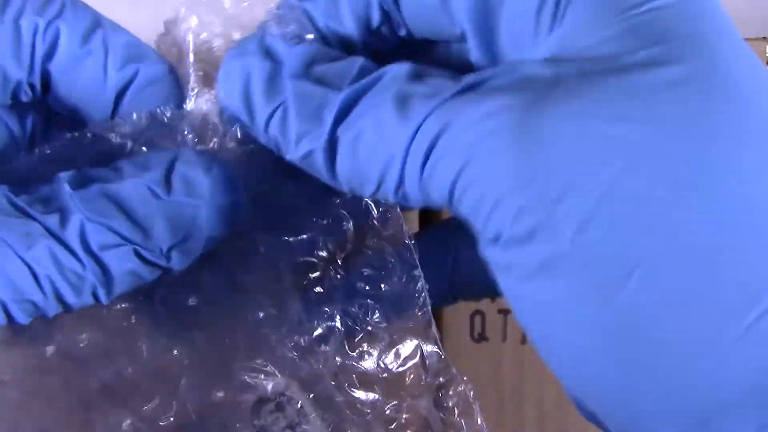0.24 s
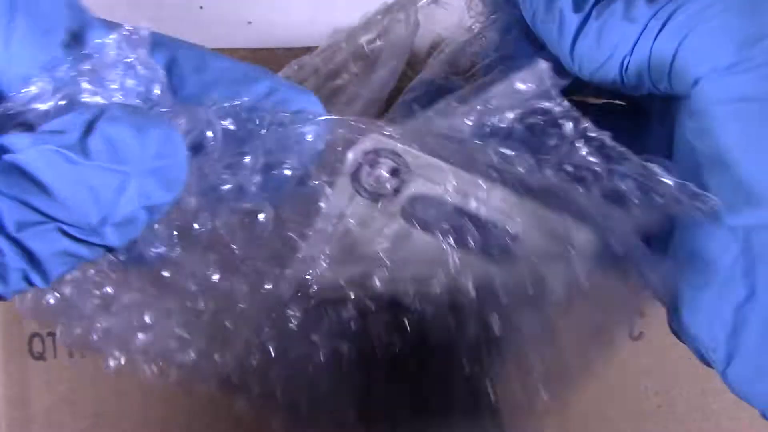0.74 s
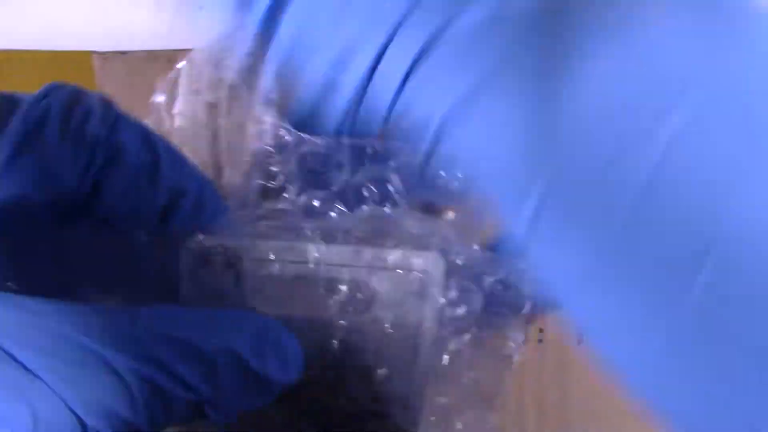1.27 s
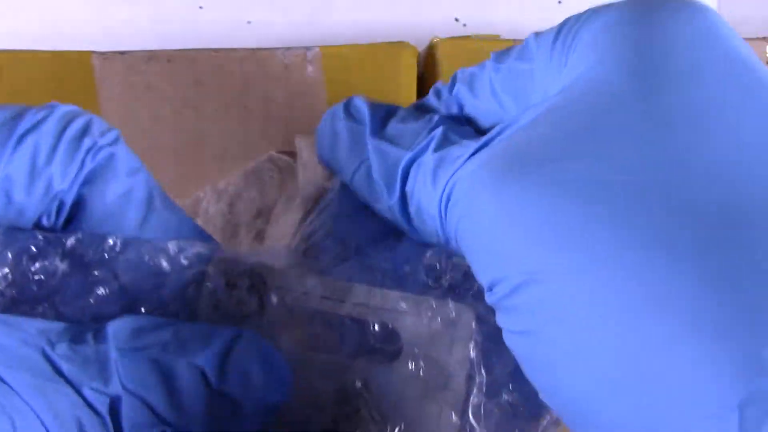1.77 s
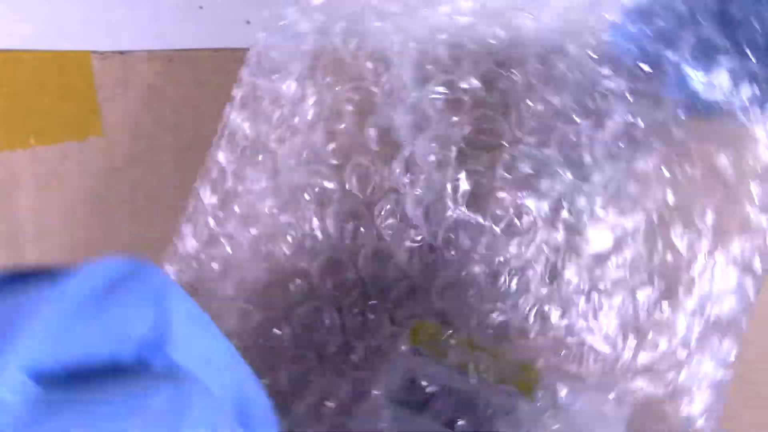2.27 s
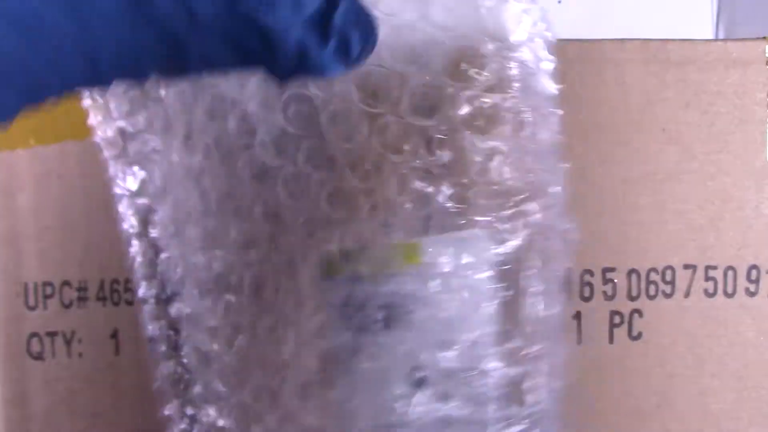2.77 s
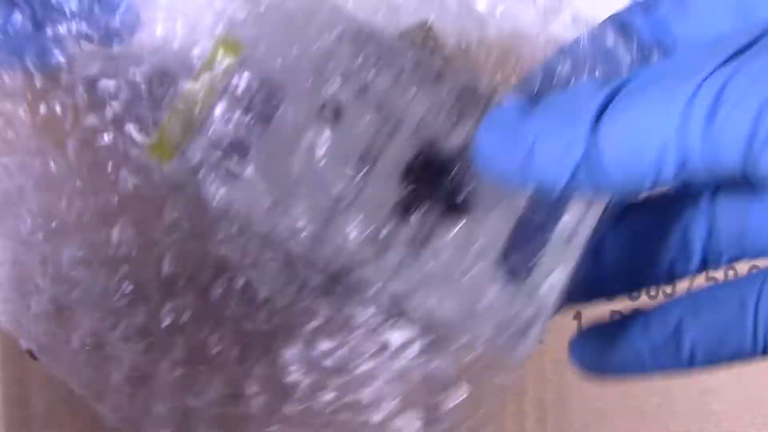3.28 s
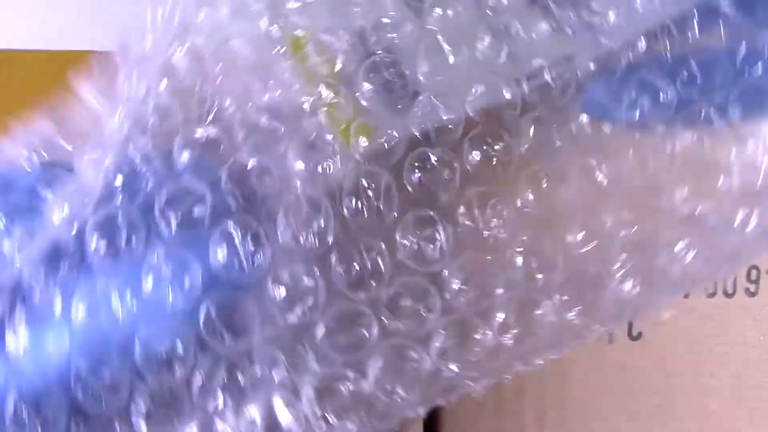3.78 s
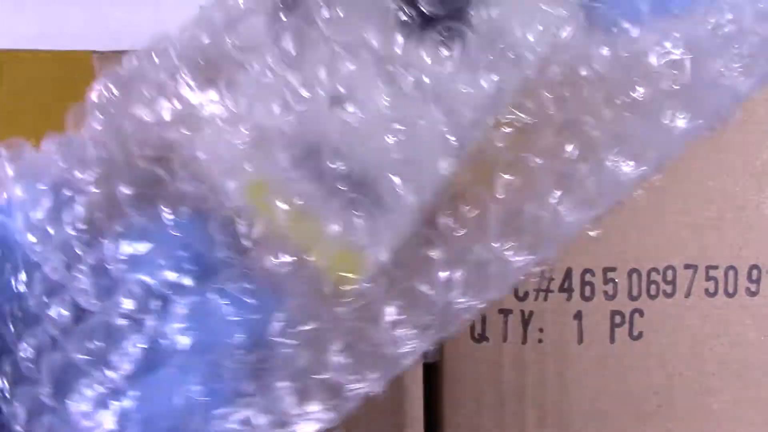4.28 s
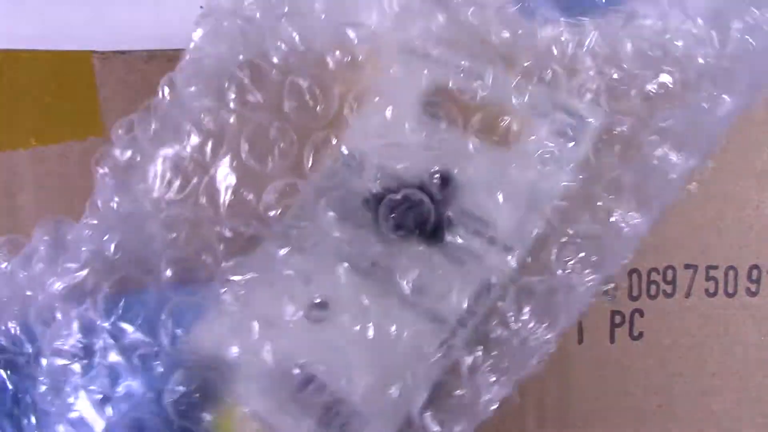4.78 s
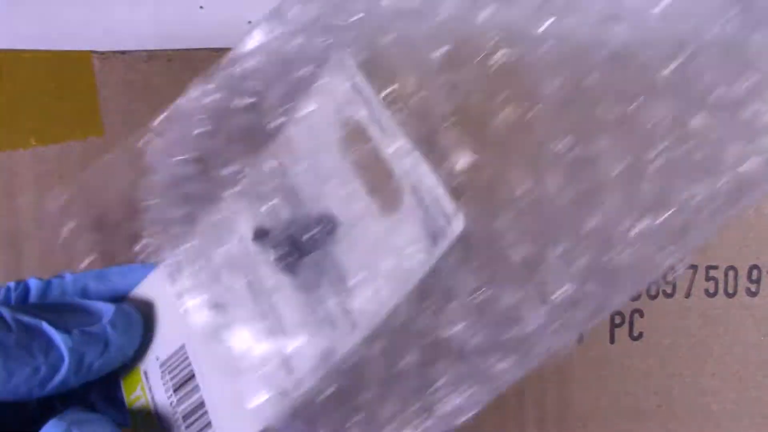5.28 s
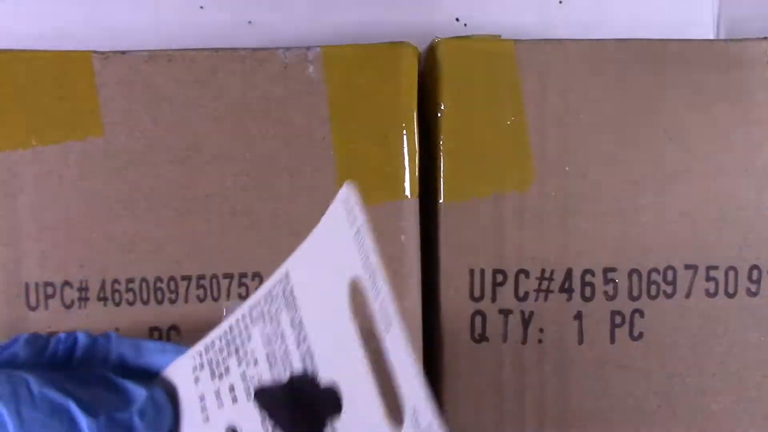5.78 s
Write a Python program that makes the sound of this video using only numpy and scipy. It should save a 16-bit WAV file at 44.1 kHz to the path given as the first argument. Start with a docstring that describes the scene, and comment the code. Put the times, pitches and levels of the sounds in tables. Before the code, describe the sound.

Plastic film crumples right at a small stereo microphone, indoors and nearly dry. Tight wrapping crackles, snaps and stutters with stick-slip zips, the loudest pops slightly overloaded and the bundle thudding softly. After a short lull the loose sheet swishes and crinkles more gently, with a few small pops, and finally slides away, leaving barely audible rustle and faint air noise.

```python
"""In a quiet room, over a cardboard box, gloved hands pull bubble wrap off a small carded item near a microphone.
The film rustles with countless tiny creases, each a click in the colour of its facet, and snaps where it buckles.
It sticks and slips in short zips and squeaks (click trains through a resonance) and sings briefly as it rubs.
Now and then the bundle bumps dully, a damped burst of noise; the loudest snaps overload the microphone.
Two close ports hear it all, with near echoes, a short room tail and faint air noise."""
import sys
import numpy as np
from scipy import signal
from scipy.fft import rfft, irfft
from scipy.io import wavfile
from scipy.ndimage import uniform_filter1d

SR = 44100
rng = np.random.default_rng(int(sys.argv[2]) if len(sys.argv) > 2 else 0)


def waveform_to_disk(signal):
    """Save audio, clipped to [-1, 1], as 16-bit WAV at the path in sys.argv[1]."""
    frames = np.transpose(np.atleast_2d(signal))
    scaled = np.clip(frames, -1, 1) * 32767
    samples = np.round(scaled).astype(np.int16)
    wavfile.write(sys.argv[1], SR, samples)


N = 266087
TIME = np.arange(N) / SR
TAPS = 2048  # length of a click's spectrum grid, in samples
HZ = np.fft.rfftfreq(TAPS, 1 / SR)
EDGE_HZ = 15900  # upper limit of the band of the whole sound
RIPPLE_DB = 2.6  # strength of the chance modes of a crease or snap


def amp(db):
    """Decibels to gain."""
    return 10 ** (np.asarray(db) / 20)


def evened(x):
    """Scales to rms 1."""
    return x / np.sqrt(np.mean(x ** 2) + 1e-20)


def smoothed(x, size, size_again):
    """Two running means, one after the other, over these numbers of samples."""
    return uniform_filter1d(uniform_filter1d(x, size), size_again)


def read(points, hz):
    """A spectrum table interpolated on a log-frequency axis."""
    f, value = np.transpose(points)
    return np.interp(np.log(hz + 1), np.log(f + 1), value)


def add(mix, s, sound):
    """Adds a sound into the mix at time s."""
    part = mix[max(round(s * SR), 0):][:len(sound)]
    part += sound[:len(part)]


def band(x, lo_hz, hi_hz):
    """Band-pass without delay."""
    edges = [lo_hz, min(hi_hz, SR / 2 - 1)]
    return signal.sosfiltfilt(signal.butter(2, edges, "band", fs=SR, output="sos"), x)


def local_rms(x, size):
    """Running rms, smoothed twice over size samples."""
    return np.sqrt(abs(smoothed(x ** 2, size, size)) + 1e-14)


def ring(colour_db):
    """The causal (minimum-phase) click, of energy 1, that has this spectrum."""
    log_gain = np.log(amp(np.r_[colour_db, colour_db[-2:0:-1]]))
    click = np.fft.ifft(np.exp(np.conj(signal.hilbert(log_gain)))).real
    return click / np.linalg.norm(click)


def facet(size):
    """Every facet of film has its own chance modes: a ripple of rms 1 over frequency."""
    return evened(smoothed(rng.standard_normal(len(HZ)), size, size))


def hump(hz, octaves):
    """A resonance of height 1 over frequency."""
    return 1 / (1 + (np.log2((HZ + 1) / hz) / octaves) ** 2)


# Light sliding of film on film that goes on under the strokes, close to the microphone.
# Each row: time in seconds, level of the middle of the spectrum in dB.
SLIDING_LEVEL = [(0, -37.5), (.3, -29), (.5, -39), (.6, -31), (1.36, -30.5), (2.27, -30), (2.38, -44),
                 (2.69, -57), (2.75, -33), (3.02, -36), (3.6, -32), (4.39, -33), (4.52, -41), (5.0, -39.5),
                 (5.04, -47), (5.42, -47), (5.52, -61), (6.03, -56)]
# Body and fizz relative to the sliding (dB); below FIRM_DB it grows duller (dB of body per dB)
SLIDE_BODY_DB, SLIDE_FIZZ_DB, FIRM_DB, DULLING = -8, -3.5, -33.5, 0.34

# Strokes of the hands over the box, each crumpling a part of the wrap.
# Each row: crest in seconds, rise and fall in seconds (each the time over STROKE_DROP_DB),
# level of the middle in dB, body and fizz in dB relative to that level.
HAND_STROKES = [(.008, 0.027, 0.043, -22.5, -8.5, -1), (.125, 0.029, 0.12, -23, -8, -6.5),
                (.38, 0.042, 0.06, -21.5, -9, -3), (.66, .08, 0.049, -17.5, -7.5, -2.5),
                (.8, 0.035, 0.1, -22.5, -17, -1), (.935, 0.12, 0.065, -20.5, -13.5, -1.5),
                (1.05, .025, 0.015, -24.5, -16, 1.5), (1.18, 0.2, 0.036, -25.5, -12, 0),
                (1.295, 0.018, 0.054, -24, -18, -9), (1.409, 0.027, 0.078, -27, -8, -10),
                (1.81, 0.011, 0.023, -18.5, -1.5, -2), (1.858, 0.023, 0.033, -16.5, -10, -1),
                (1.95, .02, 0.099, -24, -13, -1.5), (2.1, 0.046, 0.066, -23, -21, 0.5),
                (2.29, .05, 0.053, -28.5, -20, -2), (2.432, 0.018, 0.033, -40, -12, -2),
                (2.58, 0.052, 0.087, -36, -9, -5.5), (2.712, 0.0096, .04, -28.5, -4, -10),
                (2.8, 0.06, 0.12, -28.5, -8, 1), (2.895, 0.083, 0.058, -24.5, -8, -1.5),
                (2.985, .025, 0.03, -31, -5, 0.5), (3.05, 0.014, 0.13, -30.5, -5.5, -6),
                (3.22, 0.13, 0.14, -25, -8, 0), (3.429, 0.19, 0.15, -21, -13.5, -3.5),
                (3.745, 0.037, 0.082, -28.5, -4, -1), (3.84, 0.11, 0.055, -27.5, -8.5, -2.5),
                (3.99, 0.077, 0.05, -23.5, -6, -0.5), (4.35, 0.075, 0.02, -32, -2, -2),
                (4.635, 0.095, 0.026, -36.5, -6, 1), (4.735, .03, 0.064, -35.5, -8.5, -5),
                (4.892, 0.099, 0.058, -29.5, -5.5, 0), (4.956, .02, 0.038, -29.5, -8, -1.5),
                (5.19, 0.041, 0.15, -44.5, 1, -6), (5.39, .04, 0.037, -49, 6, -10),
                (5.712, 0.016, .14, -47.5, -16, -2.5), (5.8, .04, .04, -52, -8, 0)]
STROKE_DROP_DB, STROKE_SHAPE = 11.5, 1.6  # a stroke swells and dies in a rounded peak


def handling():
    """Levels (dB) of body, middle and fizz of the rustle: the strokes add their power to the sliding."""
    t = TIME[::32]
    slide = np.interp(t, *np.transpose(SLIDING_LEVEL))
    slide_body = slide + SLIDE_BODY_DB + DULLING * (FIRM_DB - slide)
    power = amp([slide_body, slide, slide + SLIDE_FIZZ_DB]) ** 2
    for crest, rise, fall, db, body_db, fizz_db in HAND_STROKES:
        away = abs((t - crest) / np.where(t < crest, rise, fall))
        crest_db = db + np.c_[[body_db, 0, fizz_db]]
        power += amp(crest_db - STROKE_DROP_DB * away ** STROKE_SHAPE) ** 2
    return [np.interp(TIME, t, 10 * np.log10(p)) for p in power]


# Creases crowd together when the sheet slides and come singly when it is flexed.
# Each row: time in seconds, spread of crease size in dB, creases per second in one facet.
CREASE_CROWDING = [(0, 1.5, 1800), (0.551, 4.5, 2010), (.8, 1, 2980), (1.151, 2.5, 3020), (1.5, 2.5, 1600),
                   (2.2, 2, 1820), (2.45, 2.5, 1030), (2.8, 3, 2790), (4.0, 2, 2400), (4.5, 4, 1380),
                   (5.3, 4, 710), (5.8, 3, 1420)]
# Colour of the loose sheet. Each row: frequency in Hz, relative gain in dB.
LOOSE_SHEET_COLOUR = [(40, -35), (90, -11.5), (190, -1.5), (380, 0.5), (680, 3), (900, -3), (1200, -0.5),
                      (1600, -1.5), (2300, 1), (3200, 1), (6000, -2), (11000, -7.5), (13600, -12),
                      (15800, -19)]
# Colour of the film while it is wound tight. Each row: frequency in Hz, relative gain in dB.
WOUND_FILM_COLOUR = [(40, -49), (120, -16.5), (300, -6.5), (700, 1.5), (900, -1), (1200, 1), (1800, -3.5),
                     (3100, 5), (4300, -1.5), (6500, 2), (10500, -2.5), (13000, -13), (15800, -18)]


def creases(life_s=.02, open_s=2.4, count=1200):
    """One facet of film after another takes the strain and crackles for an instant in its own colour."""
    out, span = np.zeros(N), int(life_s * SR)
    wound_db, sheet_db = read(WOUND_FILM_COLOUR, HZ), read(LOOSE_SHEET_COLOUR, HZ)
    times, spread_db, per_s = np.transpose(CREASE_CROWDING)
    for s in np.linspace(-life_s / 2, TIME[-1], count):
        gaps, sizes, signs = rng.exponential(1, (3, 120))
        at = (np.cumsum(gaps) * SR / np.interp(s, times, per_s)).astype(int)
        # log 2 is the median of the draw, so both signs are equally likely
        size = amp(np.interp(s, times, spread_db) * np.minimum(sizes, 4)) * np.sign(signs - np.log(2))
        clicks = np.bincount(at[at < span], size[at < span], span) * np.hanning(span) ** .5
        colour = (wound_db if s < open_s else sheet_db) + RIPPLE_DB * facet(size=22)
        crackle = signal.fftconvolve(clicks, ring(colour))
        add(out, s, crackle[max(round(-s * SR), 0):])
    return out


def rustle(levels, body_db=-0.5, mid_db=0.36, fizz_db=-0.1, body_hz=1100, fizz_hz=6200, clump_db=1.4):
    """The crackle of the wrap comes in small avalanches; big folds add body, small ones fizz."""
    clumps = evened(smoothed(rng.standard_normal(N), 240, 60))
    x = creases() * amp(clump_db * clumps)
    low = signal.sosfiltfilt(signal.butter(3, body_hz, fs=SR, output="sos"), x)
    high = signal.sosfiltfilt(signal.butter(4, fizz_hz, "high", fs=SR, output="sos"), x)
    out = np.zeros(N)
    for part, level, db in zip([low, x - low - high, high], levels, [body_db, mid_db, fizz_db]):
        out += amp(level + db) * part / local_rms(part, size=1400)
    return out


# Colour of one slip or snap at the microphone. Each row: frequency in Hz, relative gain in dB.
FILM_COLOUR = [(30, -34), (150, -20.5), (500, -11.5), (1100, -5), (1900, -2.5), (3200, 1.5), (5000, 0.5),
               (8000, 0.5), (12000, -4), (15800, -13.5)]


def film_colour(hz, resonance_db, octaves, ripple_db, ripple_size):
    """Spectrum (dB) of a stretch of film: its general colour, one resonance and chance modes."""
    return read(FILM_COLOUR, HZ) + resonance_db * hump(hz, octaves) + ripple_db * facet(ripple_size)


# Single snaps of the film, loud and faint, at set times, close to the microphone.
# Each row: time in seconds, peak in dB, resonance in Hz, body in dB.
TIMED_SNAPS = [(.148, -2, 3450, -16), (.1602, -2, 6120, -17), (.3128, -3.5, 3100, -15),
               (.3208, 0.5, 7840, -22), (.3508, 2.5, 3400, -8), (.365, 3, 3270, -7),
               (.3736, -2.5, 8440, -20), (.3817, -1, 3450, -12), (.433, 1, 9990, -27),
               (.6035, 2, 3190, -15), (.6229, 2, 5250, -3), (.6345, 2, 3100, -6), (.6928, 0, 3670, -6),
               (1.3856, 2.5, 4880, -16), (1.5272, -3.5, 9000, -12), (1.5651, 1.5, 7320, -20.5),
               (1.5881, -6.5, 2840, -10), (1.5995, 3.5, 6000, -7), (1.6695, -9, 2980, 2),
               (1.7841, 3.5, 7580, -22), (1.7928, 8, 5770, -8), (1.7944, 3.5, 5770, -5.5),
               (1.8016, 3.5, 7150, -4), (2.0156, 2, 6290, -19), (2.4025, -25, 10500, -20),
               (2.4278, -19, 4650, -15), (2.6237, -17, 2420, -4), (2.6355, -16, 2240, 1),
               (2.7001, -33, 2840, -4), (2.7875, -8, 6170, -19), (3.7481, -15, 3010, -1),
               (4.4958, -12, 6550, -16), (4.5214, -14, 8440, -18), (4.6378, -12.5, 3190, -12),
               (4.6868, -12, 6630, -21), (4.804, -10, 3170, -15.5), (5.1643, -19, 2760, -17),
               (5.179, -19, 2580, 3), (5.2652, -23, 7240, -7), (5.2851, -17, 2340, 10),
               (5.3937, -18.5, 2580, 0), (5.4446, -26, 8870, -16), (5.4744, -32, 7670, -10),
               (5.7034, -29, 6290, -16)]


def snaps(rows, resonance_db=5.5, octaves=0.23, neutral_db=-12):
    """A bubble wall buckles in a sharp jump and a dying flurry; big folds, with more body, settle slower."""
    out, t = np.zeros(N), np.arange(160) / SR
    for s, db, hz, body_db in rows:
        colour = film_colour(hz, resonance_db, octaves, RIPPLE_DB, ripple_size=22)
        colour += (body_db - neutral_db) / (1 + (HZ / 1800) ** 2)
        settle_s = np.interp(body_db, [-20, -5], [.0004, .0011])
        flurry = .45 * rng.standard_normal(len(t)) * np.exp(-t / settle_s)
        snap = np.convolve((t == 0) + flurry, ring(colour))
        add(out, s, amp(db) * snap / abs(snap).max())
    return out


# Chance buckles: how many a second, least peak at FIRM_DB (dB), its spread (dB), their body (dB)
SMALL_PER_S, SMALL_PEAK_DB, SMALL_SPREAD_DB, SMALL_BODY_DB = 18, -19, 2.0, -16
# dB of peak per dB of rustle; a wrap that rustles less than LOOSE_DB does not buckle
SMALL_FOLLOW, LOOSE_DB = 0.74, -50.5
SMALL_LOW_HZ, SMALL_HIGH_HZ = 2700, 9500  # range of their resonances


def small_snaps(level):
    """Rows of chance buckles, stronger while the wrap is worked harder."""
    gaps, sizes, places = rng.random((300, 3)).T
    s = np.cumsum(-np.log(1 - gaps)) / SMALL_PER_S
    worked = np.interp(s, TIME, level)
    extra_db = SMALL_SPREAD_DB * np.minimum(-np.log(1 - sizes), 2)
    db = SMALL_PEAK_DB + SMALL_FOLLOW * (worked - FIRM_DB) + extra_db
    hz = SMALL_LOW_HZ * (SMALL_HIGH_HZ / SMALL_LOW_HZ) ** places
    heard = np.flatnonzero((s < TIME[-1]) & (worked > LOOSE_DB))
    return [(s[k], db[k], hz[k], SMALL_BODY_DB) for k in heard]


# Stick-slip runs of the taut film, close to the microphone; the rate glides evenly in pitch.
# Each row: start, crest and end in seconds, slips per second at the start and at the end,
# level in dB before the common trim, unevenness from 0 to 1, resonance of the film in Hz, brightness in dB.
SLIP_RUNS = [(.076, 0.163, .165, 150, 600, -19.5, 0.3, 6200, -1),
             (0.167, 0.236, .245, 810, 1500, -19.5, .23, 6600, 9),
             (0.242, 0.338, .348, 800, 430, -21.5, 0.21, 3070, 2),
             (0.389, 0.393, .445, 1430, 880, -10.5, 0.29, 4500, 5.5),
             (0.438, .447, .468, 570, 180, -18.5, 0.24, 10680, 0),
             (0.522, .535, .557, 280, 310, -25.5, 0.04, 10340, -1),
             (0.559, 0.562, .604, 610, 1240, -11, 0, 9990, 6.5),
             (0.699, 0.722, .765, 330, 216, -23, 0.14, 10000, 9),
             (0.797, 0.814, .85, 1130, 310, -14, 0.3, 8100, 2),
             (0.999, 1.02, 1.023, 4500, 2400, -14.5, 0.18, 8800, 4),
             (1.139, 1.171, 1.187, 1470, 1300, -13, 0.31, 8300, -3),
             (1.196, 1.213, 1.222, 1960, 550, -9, 0.2, 6800, 1),
             (1.233, 1.237, 1.256, 480, 250, -11.5, .06, 7240, 3),
             (1.267, 1.28, 1.292, 160, 180, -11.5, 0.04, 7100, 3),
             (1.287, 1.298, 1.337, 1020, 1960, -13, 0.36, 8100, -5.5),
             (1.397, 1.398, 1.453, 730, 275, -19, 0.26, 3100, 1.5),
             (1.452, 1.461, 1.488, 400, 237, -12, 0, 7700, 4.5),
             (1.853, 1.872, 1.892, 3100, 4400, -8, 0.11, 8660, 2),
             (1.885, 1.912, 1.917, 2500, 1000, -12, .2, 8200, 2.5),
             (2.02, 2.031, 2.12, 430, 1360, -15, 0.2, 6200, 4),
             (2.098, 2.136, 2.16, 520, 1700, -12, 0.16, 7100, 2),
             (2.162, 2.2, 2.26, 180, 480, -21, 0.44, 2800, 2),
             (2.266, 2.285, 2.296, 314, 1410, -13, 0.08, 7500, -4.5),
             (3.199, 3.24, 3.305, 460, 290, -20.5, .35, 4820, 8),
             (3.37, 3.433, 3.455, 380, 760, -17, 0.28, 4700, 6.5),
             (4.18, 4.172, 4.22, 940, 1340, -18, 0.42, 4900, -1),
             (4.333, 4.357, 4.367, 650, 800, -18, 0.42, 3100, 3)]
# A run starts and ends weaker; one that grips faster than GRIP_S starts nearer full
SLIP_RISE_DB, SLIP_FALL_DB, GRIP_S = 8.5, 10, .012


def slips(trim_db=-0.5, resonance_db=6.5, octaves=0.2, ripple_db=3.5, uneven_db=7.0, shape=1.5):
    """Taut film catches and lets go many times a second; every slip rings the same stretch of film."""
    out = np.zeros(N)
    for start, crest, end, from_rate, to_rate, db, uneven, hz, bright_db in SLIP_RUNS:
        t = np.arange(start, end, 1 / SR)
        rate = np.geomspace(from_rate, to_rate, len(t))
        rise_db = SLIP_RISE_DB * np.clip((crest - start) / GRIP_S, 0, 1) ** 2
        level = db - rise_db * np.interp(t, [start, crest], [1, 0]) ** shape
        level -= SLIP_FALL_DB * np.interp(t, [crest, end], [0, 1]) ** shape
        gaps, sizes = rng.standard_normal((2, 400))
        holds = np.exp(uneven * gaps)
        due = np.cumsum(holds) - holds[0]
        turns = np.cumsum(rate) / SR
        at = np.searchsorted(turns, due[due < turns[-1]])
        clicks = np.zeros(len(t))
        # a longer hold stores more strain, so slow slips are the bigger ones
        clicks[at] = amp(level[at] + uneven_db * uneven * sizes[:len(at)]) * np.sqrt(SR / rate[at])
        colour = film_colour(hz, resonance_db, octaves, ripple_db, ripple_size=16)
        colour += bright_db * np.clip(np.log(HZ / 3500 + 1e-3), 0, 1)
        add(out, start, signal.fftconvolve(clicks, ring(colour)))
    return amp(trim_db) * out


# Film sliding on film sings briefly, close to the microphone; the row at 5.2 s is a card scraping. # Each row:
# start and end in seconds, pitch at the start and at the end in Hz, width in Hz, level in dB.
FILM_RUBS = [(0.998, 1.029, 7810, 8340, 1100, -16), (1.512, 1.572, 1498, 1320, 890, -29),
             (1.687, 1.758, 2690, 2830, 900, -29.5), (1.76, 1.789, 2970, 3880, 300, -27),
             (1.837, 1.854, 1100, 2870, 400, -27), (2.147, 2.289, 1100, 1067, 448, -30),
             (2.563, 2.639, 2100, 2390, 1120, -37.5), (3.199, 3.298, 4800, 4600, 1000, -22),
             (3.317, 3.333, 1940, 2430, 500, -22.5), (3.39, 3.455, 850, 1050, 500, -33),
             (4.169, 4.226, 4490, 4220, 600, -27.5), (5.2, 5.3, 1100, 950, 450, -45),
             (5.698, 5.84, 2420, 2394, 1100, -51.5), (5.87, 6.026, 2310, 2090, 700, -55.5)]


def rubs():
    """Friction noise through a gliding resonance."""
    out = np.zeros(N)
    for start, end, from_hz, to_hz, width, db in FILM_RUBS:
        t = np.arange(0, max(end - start, .005), 1 / SR)
        r = np.exp(-np.pi * width / SR)
        noise = [1, 1j] @ rng.standard_normal((2, SR // 4))
        flutter = signal.lfilter([1], np.poly([r, r]), noise)[-len(t):]
        phase = 2 * np.pi * np.cumsum(np.linspace(from_hz, to_hz, len(t))) / SR
        tone = (flutter * np.exp(1j * phase)).real
        add(out, start, amp(db) * evened(tone) * signal.windows.tukey(len(t), .5))
    return out


# Dull bumps of hands and bundle over the box.
# Each row: time in seconds, peak in dB before the trims of knock and boom, centre in Hz.
DULL_BUMPS = [(.351, -8, 1100), (.366, -12, 756), (.603, -9, 740), (.623, -7, 760), (.636, -6.5, 950),
              (.662, -6, 415), (.667, -1.5, 690), (.694, -16, 350), (1.599, -15, 1110), (1.794, -2.5, 1020),
              (1.802, -8.5, 390), (1.817, -10.5, 340), (1.844, -13, 700), (1.86, -19.5, 150),
              (2.094, -15, 630), (3.328, -17, 1150), (3.57, -22.5, 201), (3.748, -14.5, 450),
              (4.347, -19.5, 334), (4.356, -14, 80), (4.905, -30, 200), (5.23, -24.5, 143)]


def bumps(knock_db=-1.5, octaves=0.59, resonance_db=16.0, push_cycles=1.5, top_hz=1500, low_hz=100,
          box_hz=135, box_t60=0.072, box_db=-4.0):
    """Soft pushes on the air-filled bundle: a damped knock; deep ones last longer and set the box booming."""
    out, t = np.zeros(N), np.arange(2 * TAPS) / SR
    boom = np.sin(2 * np.pi * box_hz * t) * 1000 ** (-t / box_t60) * (1 - np.exp(-t * box_hz))
    limits_db = 20 * np.log10((1 + (HZ / top_hz) ** 2) * (1 + (low_hz / (HZ + 5)) ** 2))
    for s, db, hz in DULL_BUMPS:
        push = rng.standard_normal(len(t)) * np.exp(-t * hz / push_cycles)
        knock = signal.fftconvolve(push, ring(resonance_db * hump(hz, octaves) - limits_db))
        add(out, s, amp(db + knock_db) * knock / abs(knock).max())
        add(out, s, amp(db + box_db) * min(box_hz / hz, 1) ** 2 * boom)
    return out


# A glove drags on the cardboard near the microphone with a short low groan. # Each row: time in seconds, pitch
# in Hz, level in dB.
GLOVE_GROAN = [(0.875, 283, -44), (0.887, 322, -19.5), (.9, 315, -29), (0.915, 347, -36)]


def groan(overtone_db=-17):
    """Rubber judders on cardboard, almost a pure tone."""
    s, hz, db = np.transpose(GLOVE_GROAN)
    phase = 2 * np.pi * np.cumsum(np.interp(TIME, s, hz)) / SR
    level = amp(np.interp(TIME, s, db, left=-200, right=-200))
    return np.sqrt(2) * level * (np.sin(phase) + amp(overtone_db) * np.sin(2 * phase))


def room(x, near_db=-14.0, near_t60=0.022, far_db=-23.5, far_t60=.25, turn_s=.09, count=7):
    """Moving hands and film scatter the sound at once, ever differently; walls add a faint short tail."""
    t = np.arange(SR // 4) / SR
    out = x.copy()
    for k in range(count):
        # sets of echoes take turns, each fading into the next
        place = (TIME / turn_s - k) % count
        share = np.sin(np.pi * place / 2) * (place < 2)
        noise = rng.standard_normal((2, len(t))) * (t > .0006)
        near, far = noise * 1000 ** (-t / np.array([[near_t60], [far_t60]]))
        echoes = amp(near_db) * near / np.linalg.norm(near) + amp(far_db) * far / np.linalg.norm(far)
        out += signal.oaconvolve(x * share, echoes)[:N]
    return out


# Level by frequency of the faint phase-scattered copy that sets the two channels apart.
# Each row: frequency in Hz, gain in dB.
SIDE_SPREAD = [(30, -18), (125, -24), (250, -26.5), (500, -40.5), (2000, -66), (4000, -46), (8000, -21.5),
               (15000, -30.5)]


def scattered_copy(x, scatter_s=.003):
    """A faint phase-scattered copy of the sound, to be added with opposite signs in the two channels."""
    burst = rng.standard_normal(TAPS) * np.exp(-np.arange(TAPS) / SR / scatter_s)
    turn = np.exp(1j * np.angle(rfft(burst, N)))  # only the phases of the noise burst
    gain = amp(read(SIDE_SPREAD, np.fft.rfftfreq(N, 1 / SR)))
    return irfft(rfft(x) * turn * gain, N)


# The still room around the box. Each row: frequency in Hz, relative gain in dB.
AIR_COLOUR = [(18, -53), (30, -24.5), (183, 4.5), (318, 2), (382, 4), (735, -7.5), (1060, -13),
              (1380, -15.5), (5990, -22), (15800, -39)]


def air(level_db=-62):
    """Steady faint noise of the room."""
    colour = amp(read(AIR_COLOUR, np.fft.rfftfreq(N, 1 / SR)))
    return amp(level_db) * evened(irfft(rfft(rng.standard_normal(N)) * colour, N))


def scene(side_db=-23.5, side_hz=4000, apart_db=-3.5, tilt_db=.2):
    """Everything happens in front of two close ports, which differ a little in the bass and the treble and
    hardly in between."""
    body, middle, fizz = handling()
    wrap = rustle([body, middle, fizz]) + snaps(list(TIMED_SNAPS) + small_snaps(middle))
    wrap += slips() + rubs() + bumps() + groan()
    mid = room(wrap) + air()
    # ports a little apart sense the slope of the wave
    side = amp(side_db) * band(np.gradient(mid), side_hz, EDGE_HZ)
    # room noise and the scattered copy also set the channels apart
    side += amp(apart_db) * air() + scattered_copy(mid)
    return np.array([amp(tilt_db) * mid + side, mid - side])


def record(dry):
    """The microphone overloads softly, rounding off the loudest peaks; then a low-pass at EDGE_HZ."""
    rounded = dry / (1 + (dry / .9) ** 6) ** (1 / 6)
    low_pass = signal.firwin(401, EDGE_HZ, window=("kaiser", 8), fs=SR)
    return signal.oaconvolve(rounded, low_pass[None], "same")


dry = scene()
out = record(dry)
waveform_to_disk(out)
```